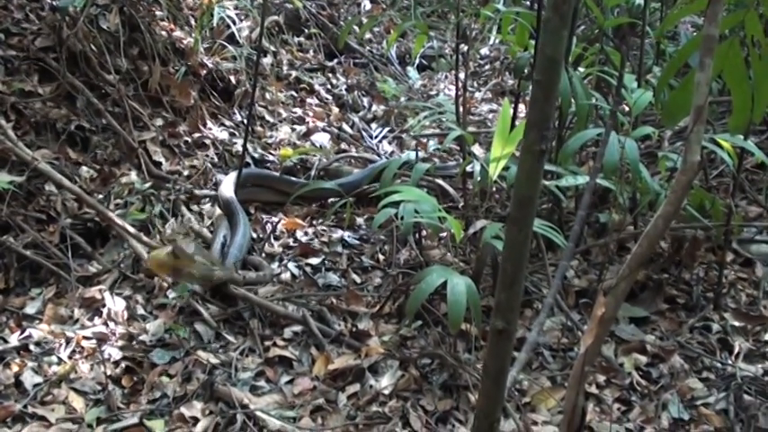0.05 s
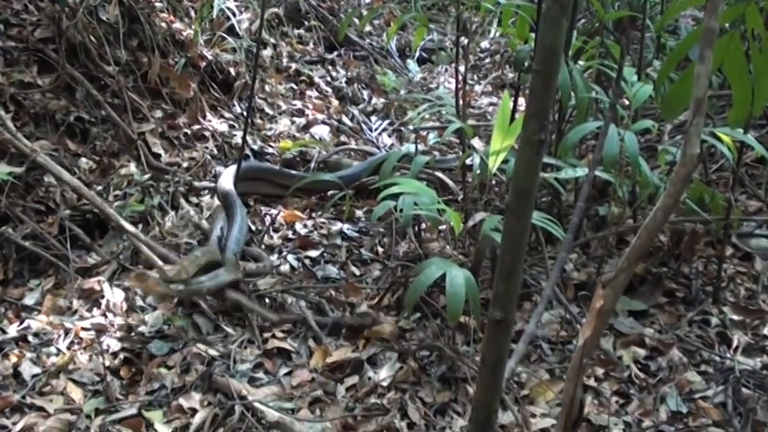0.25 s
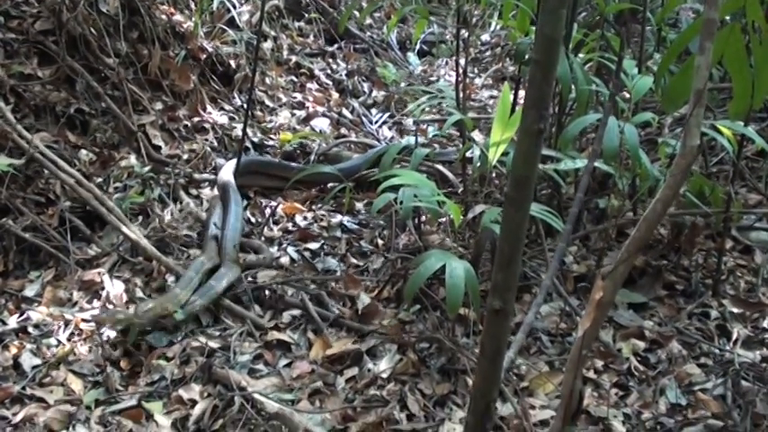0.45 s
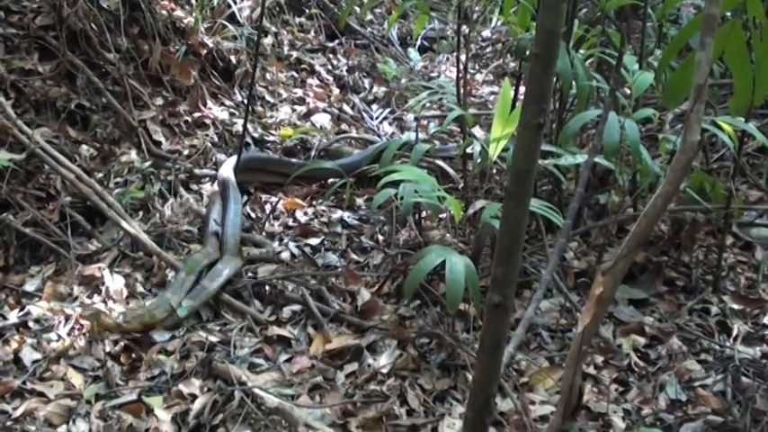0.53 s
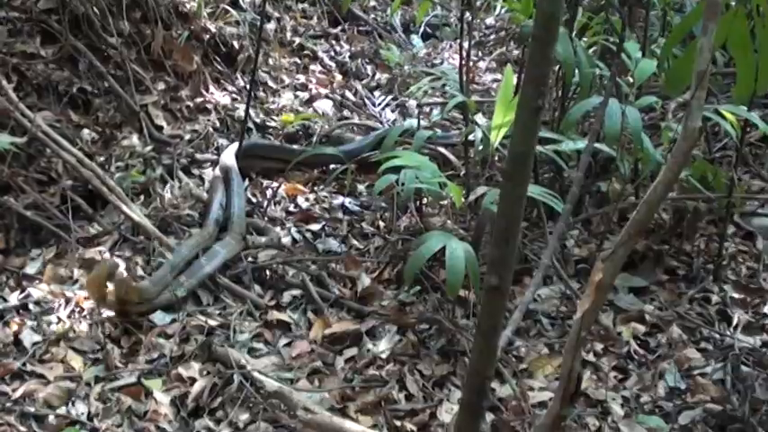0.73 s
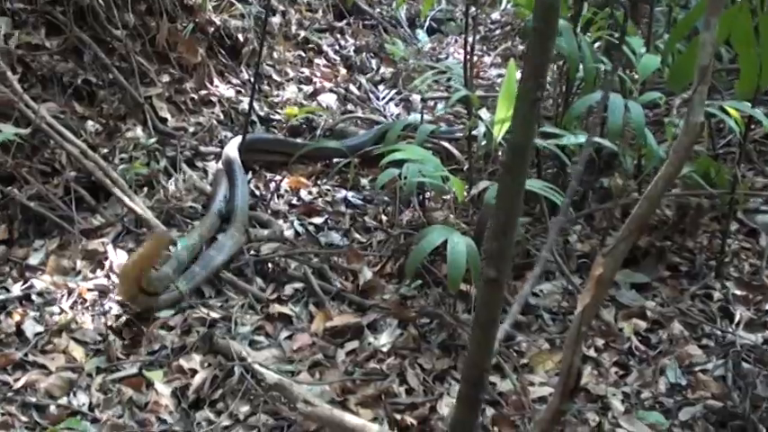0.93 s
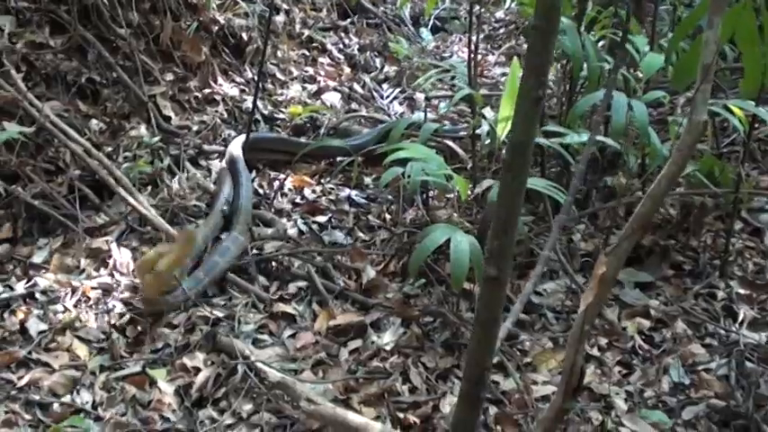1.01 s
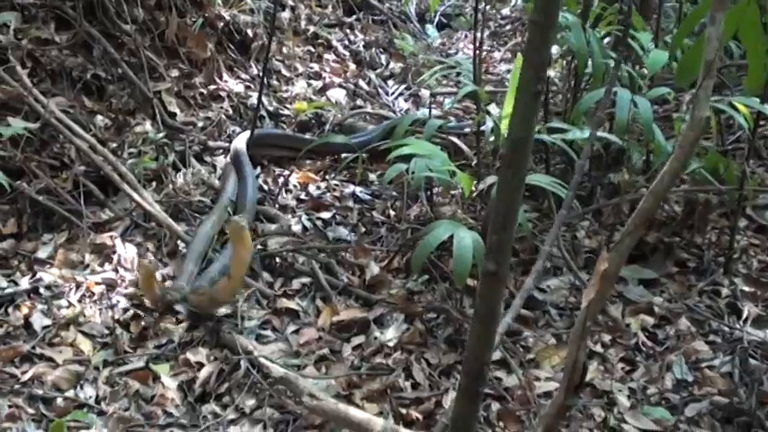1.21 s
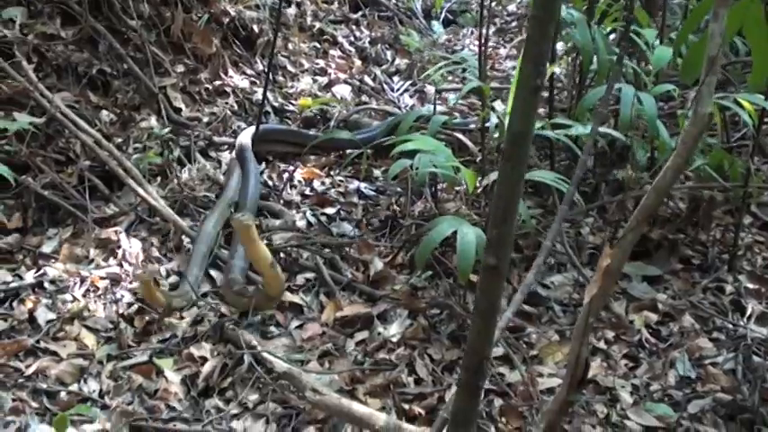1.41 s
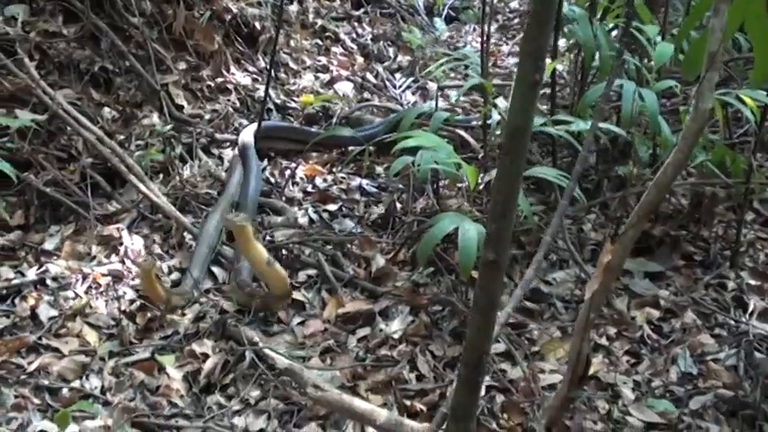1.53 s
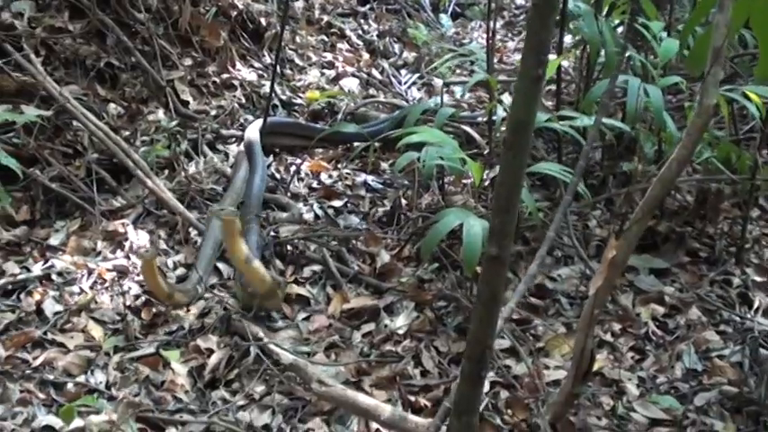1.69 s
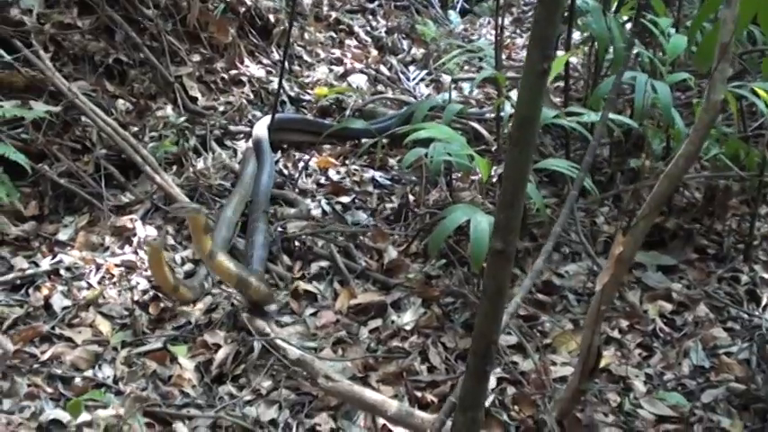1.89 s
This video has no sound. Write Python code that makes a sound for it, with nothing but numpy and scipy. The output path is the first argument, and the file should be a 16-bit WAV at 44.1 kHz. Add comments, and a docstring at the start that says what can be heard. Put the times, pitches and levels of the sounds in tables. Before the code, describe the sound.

Large snakes wrestle in dry leaf litter, rustling and crunching with a slap and snaps.

```python
"""A faint forest hiss and a light rustle, then a slap: two large snakes wrestle in dry leaves nearby.
The impact of a body breaks the litter in a burst of tiny fractures. Coils then drag through it by
stick-slip friction: leaves crumple in swarms of clicks, stalks snap and ring, the soil thuds softly.
Litter and trunks scatter each crack into a short tail, heard at two closely spaced microphone ports."""
import sys
import numpy as np
from scipy import signal
from scipy.fft import rfft, irfft
from scipy.io import wavfile

SR = 44100
rng = np.random.default_rng(int(sys.argv[2]) if len(sys.argv) > 2 else 0)


def transcribe(u):
    """Save the signal u as a 16-bit wav file named by the first command-line argument.

    u: samples, shape (n,) or (channels, n), limited to [-1, 1]; the rate is SR.
    q: integer samples, one column per channel.
    """
    v = np.clip(np.atleast_2d(u).T, -1, 1)
    q = np.round(v * 32767).astype(np.int16)
    wavfile.write(sys.argv[1], SR, q)


N = 85995


def undb(db):
    """Amplitude ratio of a level in decibels."""
    return 10 ** (np.asarray(db) / 20)


def unit(x):
    """Normalisation to rms 1."""
    return x / np.sqrt(np.mean(x ** 2))


def envelope(rows):
    """Amplitude envelope through (t/s, level/dB) points."""
    return undb(np.interp(np.arange(N) / SR, *np.array(rows).T))


def by_freq(rows, size, column=1):
    """Interpolation of a table column over log frequency, at every FFT bin."""
    rows = np.array(rows, float)
    hz = np.arange(size // 2 + 1) * SR / size
    return np.interp(np.log(hz + 1), np.log(rows[:, 0]), rows[:, column])


def minimum_phase(x, db):
    """Causal filtering to a gain in dB per bin, by folding the cepstrum."""
    size = 2 * (len(db) - 1)
    cepstrum = irfft(np.log(undb(db)))
    cepstrum[1:size // 2] *= 2
    cepstrum[size // 2 + 1:] = 0
    return irfft(rfft(x, size) * np.exp(rfft(cepstrum)))[..., :x.shape[-1]]


def colour(x, rows, size=131072):
    """Spectral shaping through (f/Hz, level/dB) points."""
    return minimum_phase(x, by_freq(rows, size))


def wander(per_s):
    """Random modulation: linear interpolation between Gaussian values."""
    return np.interp(np.arange(N) / SR * per_s, np.arange(N), rng.standard_normal(N))


def add(out, start, x):
    """Superposition of x from a start time in seconds."""
    i = int(start * SR)
    out[i:i + len(x)] += x[:len(out) - i]


def fracture(decay, spectrum_db, hold=0.00049):
    """Brittle fracture: tiny breaks hold, then decay exponentially; rms near 1 over the loud part."""
    t = np.arange(len(spectrum_db)) / SR
    fade = np.exp(-np.maximum(t - hold, 0) / decay)
    breaks = rng.choice([-1, 1], len(t)) * rng.uniform(0.41, 1, len(t))
    burst = minimum_phase(breaks * fade, spectrum_db)
    return burst * np.sqrt((hold + 2 * decay) * SR / np.sum(burst ** 2))


# Spectrum of the forest hiss: f/Hz, relative level/dB
HISS_SPECTRUM = [(25, -26.5), (100, -10.5), (230, -2.5), (450, -7), (950, -5.5), (1500, -16), (2300, -13),
                 (3200, -19), (4500, -17.5), (6200, -22.5), (7600, -23), (10000, -15), (15500, -17)]
def forest_hiss(level_db=-56.5, width=0.6):
    """Diffuse field: steady noise from all round, independent in mid and side."""
    hiss = unit(colour(rng.standard_normal((2, N)), HISS_SPECTRUM))
    return undb(level_db) * hiss * [[1], [width]]


# Spectrum of the reverberation among the trunks: f/Hz, relative level/dB
TAIL_SPECTRUM = [(100, -9.5), (1000, -6), (5000, 0.5), (9000, -1.5), (15000, -1.5)]
def echoes(x, scatter_s=0.0088, t60_s=0.32, width=0.34):
    """Scattering: the litter returns sound at once, the trunks as a longer tail. Mid and side."""
    t = np.arange(SR // 2) / SR
    litter = rng.standard_normal((2, len(t))) * np.exp(-t / scatter_s)
    litter *= 1 - np.exp(-(t / 0.0024) ** 2)
    trunks = colour(rng.standard_normal((2, len(t))), TAIL_SPECTRUM)
    trunks *= np.exp(-np.log(1000) * t / t60_s) * (1 - np.exp(-t / 0.0036))
    response = (undb(-7.5) * unit(litter) + undb(-11) * unit(trunks)) / np.sqrt(len(t))
    return signal.fftconvolve(x[None], response, axes=1)[:, :N] * [[1], [width]]


# Envelope of the low rustle: t/s, level/dB
DEEP_LEVEL = [(0, -62.5), (.23, -66.5), (.31, -57.5), (.42, -51), (.47, -59), (.59, -54.5), (.72, -62),
              (.82, -51.5), (1.0, -57.5), (1.32, -54.5), (1.58, -62), (1.68, -56), (1.95, -57.5)]
# Its spectrum: f/Hz, relative level/dB
DEEP_SPECTRUM = [(30, -37.5), (90, -10), (220, -2), (450, 1), (900, -9.5), (1700, -3), (4000, -25)]
RUSTLE_WIDTH = 0.14  # side/mid amplitude ratio
def deep_rustle():
    """Friction noise: the deeper layers of litter rustle low. Mid and side."""
    noise = unit(colour(rng.standard_normal((2, N)), DEEP_SPECTRUM))
    return noise * envelope(DEEP_LEVEL) * undb(1.8 * wander(40)) * [[1], [RUSTLE_WIDTH]]


# Knocks of a body on the soil: t/s, level/dB, f/Hz
SOIL_THUDS = [(.247, -55.5, 71), (0.396, -65, 280), (0.593, -53, 231), (1.712, -49, 269)]
def thuds(hz, decay_s=0.0075, skirt_db_per_octave=14):
    """Damped impact: soft soil gives a brief knock centred on one low frequency."""
    out = np.zeros(N)
    for start, db, peak_hz in SOIL_THUDS:
        spectrum = -skirt_db_per_octave * np.abs(np.log2((hz + 10) / peak_hz))
        add(out, start, undb(db) * fracture(decay_s, spectrum))
    return out


# Presses of a coil: t/s, level/dB, decay/s
COIL_CRUNCHES = [(.327, -41.5, 0.0072), (1.0428, -38.5, 0.0038), (1.2995, -40.5, 0.012),
                 (1.319, -45.5, 0.006), (1.4169, -41.5, 0.0037), (1.431, -46.5, .008), (1.4443, -46, .003),
                 (1.470, -45, 0.0035), (1.713, -46, 0.003), (1.7991, -43.5, 0.0032)]
# Their spectrum: f/Hz, relative level/dB
CRUNCH_SPECTRUM = [(80, -14), (300, -7.5), (800, 5.5), (1200, -0.5), (1900, 2.5), (3500, -3.5),
                   (9000, -16.5)]
def crunches(size):
    """Compression: packed litter gives way under a coil with a dull crunch."""
    out = np.zeros(N)
    for start, db, decay in COIL_CRUNCHES:
        add(out, start, undb(db) * fracture(decay, by_freq(CRUNCH_SPECTRUM, size)))
    return out


def leaf_ticks(per_s=130, centre_hz=4550, spread_octaves=0.49, decay_cycles=2.44, leaves=600):
    """Free vibration: single leaves spring back, each a damped sinusoid at its own pitch."""
    out, t = np.zeros(N), np.arange(256) / SR
    chances = rng.random((leaves, 2))
    deviations = np.clip(rng.standard_normal((leaves, 2)), -2, 2)
    for (when, luck), (pitch, strength) in zip(chances, deviations):
        if luck < per_s * N / SR / leaves:
            cycles = centre_hz * 2 ** (spread_octaves * pitch) * t
            ring = np.sin(2 * np.pi * cycles) * np.exp(-cycles / decay_cycles)
            add(out, when * N / SR, undb(5 + 4 * strength) * ring)
    return out


def clicks(per_s=1500, spread_db=1.5):
    """Poisson process: a swarm of impulses, the weaker ones most common; rms 1."""
    strength = undb(spread_db * np.minimum(rng.exponential(size=N), 5.5))
    return unit((rng.random(N) < per_s / SR) * rng.choice([-1, 1], N) * strength)


# Spectral weighting of crumpling leaves: f/Hz, relative level/dB
LEAF_SPECTRUM = [(150, -10.5), (450, -11.5), (860, -3.5), (1150, -6), (2000, -1.5), (2900, -2),
                 (3700, -0.5), (4500, 1.5), (5300, 2), (6200, -4.5), (7400, 2), (8400, -2.5), (10000, -9),
                 (12000, -15.5), (15500, -22)]
def crumple(bands=9, rub_gain=0.51, flicker_db=2.27):
    """Crackling noise: each size of leaf clicks in its own band, over the rub of scales."""
    edges_hz = np.geomspace(300, 16000, bands + 1)
    shared_clicks, out = clicks(), 0
    for k in range(bands):
        force = shared_clicks + clicks() + rub_gain * rng.standard_normal(N)
        bandpass = signal.butter(2, edges_hz[k:k + 2], "band", fs=SR, output="sos")
        out += (-1) ** k * signal.sosfilt(bandpass, force) * undb(flicker_db * wander(60.01))
    return unit(colour(out, LEAF_SPECTRUM))


# How hard the coils drag: t/s, level/dB
DRAG_LEVEL = [(0, -55.5), (.14, -51), (.243, -53), (.262, -33.5), (.32, -35), (.40, -35), (.45, -42),
              (.51, -44.5), (.545, -36), (.575, -38), (.625, -39), (.675, -43), (.705, -48.5), (.80, -46.5),
              (.895, -49.5), (.96, -41.5), (1.005, -45), (1.06, -52), (1.115, -42.5), (1.175, -37.5),
              (1.205, -45.5), (1.285, -42.5), (1.325, -35.5), (1.352, -40.5), (1.405, -44), (1.437, -33.5),
              (1.46, -44.5), (1.55, -43), (1.60, -48), (1.625, -43), (1.71, -46.5), (1.75, -50),
              (1.95, -48)]
def dragging(grip_db=0.2, grip_per_s=54):
    """Stick-slip friction: leaves crumple and tick louder under a harder drag. Mid and side."""
    leaves = np.array([crumple() + leaf_ticks(), RUSTLE_WIDTH * crumple()])
    return leaves * envelope(DRAG_LEVEL) * undb(-grip_db * wander(grip_per_s))


# Breaking stalks and stiff leaves: t/s, level/dB, ring f/Hz, decay/s, slope above f/(dB per octave)
STALK_SNAPS = [(0.4125, -31, 5800, 0.0009, 7), (0.5532, -27, 3980, 0.00065, -9),
               (0.6557, -35, 2850, 0.0027, -5.5), (0.6705, -29, 4140, 0.0014, -2.5),
               (.757, -45, 2860, 0.0025, 1), (.7978, -42, 5040, 0.0021, -3), (.8055, -42, 4400, 0.0008, -6),
               (0.905, -30.5, 7800, 0.0014, 3), (.9420, -42, 7000, .0005, 0),
               (0.964, -37, 7340, 0.0014, -10), (1.0122, -38.5, 2260, 0.0075, -6),
               (1.0184, -16, 5200, 0.0012, -2), (1.0231, -29, 5650, 0.0038, -5),
               (1.0428, -19.5, 4300, 0.0007, 1.5), (1.0462, -32, 4500, 0.0033, -6),
               (1.0803, -32.5, 5900, 0.00087, -2), (1.127, -46, 3940, 0.0021, -4),
               (1.176, -36, 7500, .001, 1), (1.263, -38.5, 7100, .001, -9), (1.272, -45, 2460, 0.0026, -3),
               (1.3152, -39, 4200, .0012, -7), (1.3200, -29, 3680, 0.0011, -2.5),
               (1.338, -38, 4000, 0.0015, -5), (1.4173, -31, 5000, .0008, -2),
               (1.4293, -30, 7150, 0.0011, 15), (1.4441, -31.5, 2730, 0.00067, 0),
               (1.47, -42, 5000, .0015, -3), (1.52, -42.5, 2600, 0.0014, -6),
               (1.5368, -32.5, 5300, 0.00093, -4.5), (1.5633, -39, 8500, .002, -3),
               (1.5705, -40.5, 8450, 0.0018, -5), (1.6980, -37, 4260, 0.0009, -3),
               (1.9330, -44, 3500, .001, -2)]
# Their common spectrum: f/Hz, relative level/dB
SNAP_SPECTRUM = [(40, -52), (200, -17), (500, -16), (1200, -15), (1800, -7.5), (2800, -5.5), (4300, -2.5),
                 (6300, -4.5), (7400, 2.5), (8400, -4), (9200, 0), (11500, -11.5), (16000, -21)]
def snaps(hz, size, bandwidth_hz=1100, ring_db=9.5):
    """Resonance: each break excites a stalk or stiff leaf at its natural frequency."""
    out = np.zeros(N)
    for start, db, ring_hz, decay, slope in STALK_SNAPS:
        detuning = 2 * (hz - ring_hz) / bandwidth_hz
        ring = 20 * np.log10(1 + undb(ring_db) / (1 + detuning ** 2))
        treble = slope * np.log2(np.maximum(hz / ring_hz, 1))
        add(out, start, undb(db) * fracture(decay, by_freq(SNAP_SPECTRUM, size) + ring + treble))
    return out


# Layers that give way in the slap: t/s, level/dB, hold/s, decay/s
SLAP_LAYERS = [(0.2468, -16.5, 0.0008, 0.00044), (.2482, -18.5, 0.0019, 0.00047),
               (0.2528, -18, 0.00039, 0.0049)]
# Their spectrum: f/Hz, relative level/dB
SLAP_SPECTRUM = [(35, -36), (70, -28), (200, -21), (500, -13.5), (1050, -12.5), (1700, -1), (2500, 3.5),
                 (2900, -3), (4200, 2), (5400, -1), (6200, -5), (7300, 5.5), (8200, 1.5), (8800, -7),
                 (10500, -8), (11400, -14.5), (15500, -17)]
def slap(size):
    """Impact: a body breaks three layers of litter within milliseconds."""
    out = np.zeros(N)
    for start, db, hold, decay in SLAP_LAYERS:
        add(out, start, undb(db) * fracture(decay, by_freq(SLAP_SPECTRUM, size), hold))
    return out


def cracks(size=4096):
    """Directional radiation: the transients sent one way, with new fine structure at each call."""
    hz = np.arange(size // 2 + 1) * SR / size
    return slap(size) + snaps(hz, size) + crunches(size) + thuds(hz)


# Microphone ports: f/Hz, left minus right level/dB, left phase lead/rad, side gain/dB
PORT_RESPONSE = [(60, -0.5, 0, -12), (400, .5, 0.015, 1), (1200, 0.5, -0.19, 3), (2300, 1.5, -.24, 5),
                 (3820, 0.1, -0.48, 3), (5540, -2.5, -0.44, 4.5), (6760, -2.5, 0.54, 4),
                 (8000, 0.2, 0.44, -6.5), (9250, 0.5, 0.098, -12), (16000, -1.5, 0, -41)]
def scene(size=131072, directions=3):
    """Superposition: direct and scattered sound reach two ports with unequal level and phase."""
    scattered = sum(echoes(cracks()) for _ in range(directions)) / np.sqrt(directions)
    direct = np.array([cracks(), np.zeros(N)])
    mid, side = rfft(direct + scattered + dragging() + deep_rustle() + forest_hiss(), size)
    balance_db, lead, side_db = (by_freq(PORT_RESPONSE, size, column) for column in (1, 2, 3))
    side *= undb(side_db)
    leftward = undb(balance_db / 2) * np.exp(0.5j * lead)
    return irfft(np.array([(mid + side) * leftward, (mid - side) / leftward]))[:, :N]


def record(dry, cutoff_hz=15850):
    """Band limiting: a steep elliptic low-pass removes the highest treble."""
    return signal.sosfilt(signal.ellip(10, 0.2, 70, cutoff_hz, fs=SR, output="sos"), dry)


dry = scene()
out = record(dry)
transcribe(out)
```